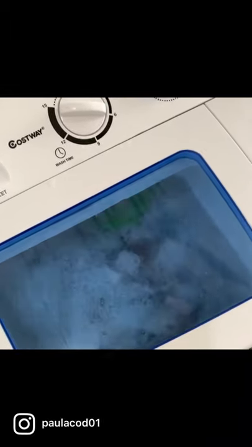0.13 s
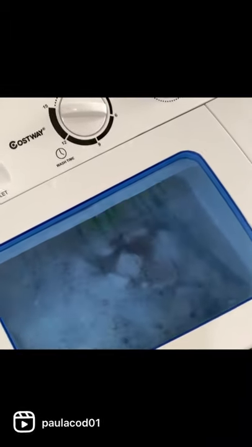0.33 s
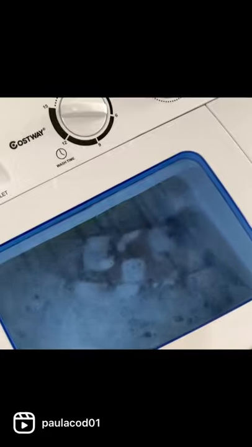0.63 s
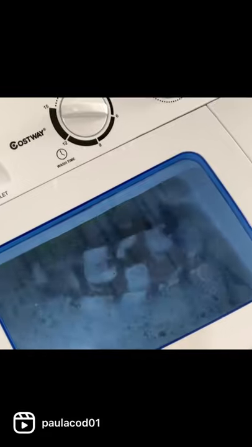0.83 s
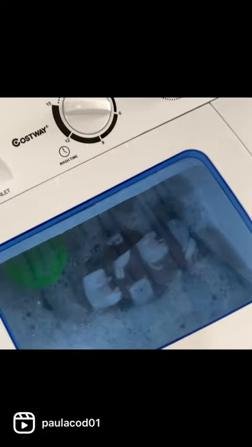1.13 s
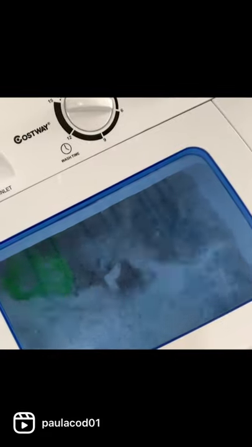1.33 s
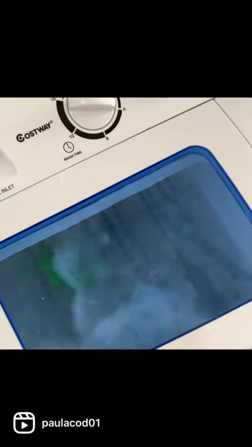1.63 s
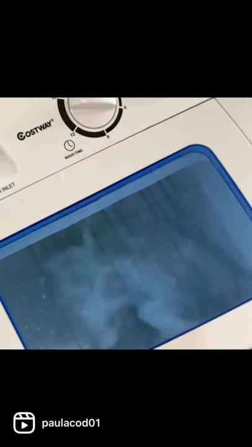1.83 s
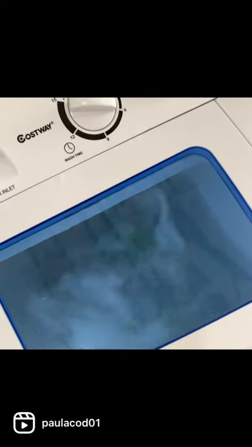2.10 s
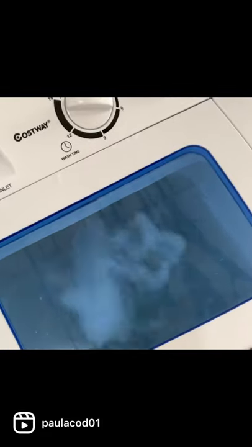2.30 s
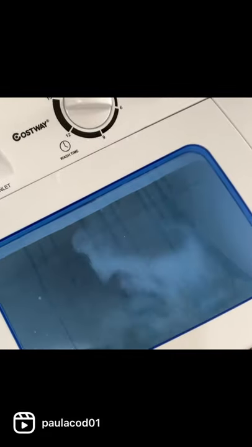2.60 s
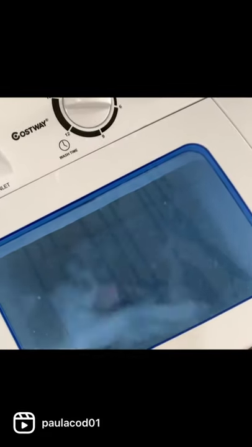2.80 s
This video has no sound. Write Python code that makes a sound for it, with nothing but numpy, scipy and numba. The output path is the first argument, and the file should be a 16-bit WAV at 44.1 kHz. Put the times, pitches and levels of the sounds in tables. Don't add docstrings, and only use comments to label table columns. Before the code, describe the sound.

A small washing machine motor, heard close above the tub in a hard room. Until 0.65 s only rapid faint timer ticks, a soft whirr and small water gulps. A switch snaps at about 0.68 s; the motor swells into a low mains hum with tub rumble by 0.95 s. Water sloshes, with a clear gulp near 2.3 s; hissing spray rises around a hard snap at 2.66 s, motor still running.

```python
import sys
import numpy as np
from scipy import signal
from scipy.fft import rfft, irfft
from scipy.io import wavfile
from scipy.ndimage import uniform_filter1d
from numba import njit

SR = 44100
rng = np.random.default_rng(int(sys.argv[2]) if len(sys.argv) > 2 else 0)


def put_to_file(sound):
    columns = np.atleast_2d(sound).T
    safe = np.clip(columns, -1, 1)
    whole_steps = np.round(safe * 32767)
    wavfile.write(sys.argv[1], SR, whole_steps.astype(np.int16))


def invert_db(level):
    return 10 ** (np.asarray(level, dtype=float) / 20)


N = 130095
TIME = np.arange(N) / SR
START_S = 0.68


def level(x, db):
    return x * invert_db(db) / np.sqrt(np.mean(x ** 2))


@njit
def resonator(x, hz, width):
    y, band, low = np.empty(len(x)), 0., 0.
    g, k = np.tan(np.pi * hz / SR), width / hz
    for i in range(len(x)):
        v = (band + g * (x[i] - low)) / (1 + g * (g + k))
        band, low = 2 * v - band, low + 2 * g * v
        y[i] = k * v
    return y


def walk(rate):
    k = int(SR / rate)
    steps = np.repeat(rng.standard_normal(N // k + 1), k)
    return 1.336 * uniform_filter1d(uniform_filter1d(steps, k), k)[:N]


def column(table, axis):
    points = np.array(table)
    return np.interp(TIME, points[:, 0], points[:, axis])


def switch_on(rise_s):
    return np.clip((TIME - START_S) / rise_s, 0, 1)


def coloured(shape, flicker_db, rate, shared_db=0.):
    hz = np.maximum(np.arange(N // 2 + 1) * SR / N, 1)
    points = np.array(shape)
    colour_db = np.interp(np.log(hz), np.log(points[:, 0]), points[:, 1], left=-90, right=-90)
    spectrum = rfft(rng.standard_normal(N)) * invert_db(colour_db)
    place = 2 * np.log2(hz)
    out = np.zeros(N)
    for centre in range(9, 29):
        weight = np.clip(1 - abs(place - centre), 0, 1)
        out += irfft(spectrum * weight, N) * invert_db(flicker_db * walk(rate))
    return level(out * invert_db(shared_db * walk(rate)), 0)


def strikes(times, dbs, body, rise_s, bright_db=0.):
    out = np.zeros(N)
    at = np.clip((np.array(times) * SR).astype(int), 0, N - 1)
    rise = 1 / (rise_s * SR + 1)
    for hz, width, db, t60 in body:
        hits = np.zeros(N)
        hits[at] = invert_db(np.array(dbs) + db + (hz > 8000) * np.array(bright_db))
        env = signal.lfilter([1], [1, -invert_db(-60 / (t60 * SR))], hits)
        env = signal.lfilter([rise], [1, -1 + rise], env)
        out += env * level(resonator(rng.standard_normal(N), min(1. * hz, 16000.), 1. * width), 0)
    return out


def bubbles(rows, cycles_1k, glide, size=0):
    out = np.zeros(N + SR)
    for t, db, hz in rows:
        cycles = cycles_1k * (hz / 1000) ** size
        u = np.arange(int(3 * cycles / hz * SR) + 2) / SR * hz / cycles
        env = np.exp(-2.3 * u) * (1 - np.exp(-14 * u))
        tone = np.sin(2 * np.pi * cycles * (u + glide * u * u / 2))
        out[int(t * SR):][:len(u)] += invert_db(db) * env * tone
    return out[:N]


# (time [s], power [dB], shaft lines [dB], tub rumble [dB])
MOTOR_LOAD = [(.69, -46, -3, 5), (.75, -35, -4, -1), (.83, -29.5, 0, 0), (.94, -25.5, 1, -1.5),
              (1.1, -27, -1, -0.5), (1.22, -25, 1, -1), (1.45, -27, -1.5, -1.5), (1.62, -24, 0, -1.5),
              (2.05, -27, -1, -2), (2.25, -25, -2, -1.5), (2.48, -29, -3.5, -4), (2.55, -24.5, -2, -1),
              (2.75, -27, -3.5, -2), (2.86, -23.5, -3.5, -0.5), (2.95, -26, -4, -0.5)]
# (multiple of 120.56 Hz, level [dB])
HUM_HARMONICS = [(1, -4), (2, -15.5), (3, -22.5)]
# (multiple of shaft rate, level [dB])
SHAFT_ORDERS = [(1, -29.5), (3, -12), (4, -7.5), (5, -17), (6, -18.5), (9, -25)]
# (frequency [Hz], level per Hz [dB])
TUB_COLOUR = [(60, -25), (100, -6), (140, -3.5), (210, 0), (300, -7), (420, -16), (700, -34), (1500, -51)]


def motor():
    mains_hz, shaft_hz = 120.56, 55.3
    hum = []
    for k, db in HUM_HARMONICS:
        waver_db = (.8 if k == 1 else 3.) * walk(8.92)
        hum.append(invert_db(db + waver_db) * np.sqrt(2) * np.sin(2 * np.pi * k * mains_hz * TIME + k))

    start_hz, sag_s = 2.2, .5
    speed_hz = shaft_hz + start_hz * np.exp(-np.maximum(TIME - 1, -.2) / sag_s)
    turn = 2 * np.pi * np.cumsum(speed_hz * (1 + 0.003003 * walk(5.93))) / SR
    shaft = np.zeros(N)
    for k, db in SHAFT_ORDERS:
        shaft += invert_db(db + 2.72 * walk(11)) * np.sqrt(2) * np.sin(k * turn + k * k)

    power = invert_db(column(MOTOR_LOAD, axis=1)) * switch_on(.03)
    tub = invert_db(-2.5 + column(MOTOR_LOAD, axis=3)) * coloured(TUB_COLOUR, 1.3, 14, 1.18)
    body = sum(hum[1:]) + shaft * invert_db(column(MOTOR_LOAD, axis=2)) + tub
    spread = invert_db(-18.5) * coloured(TUB_COLOUR, 1.5, 12)
    return power * hum[0], power * body, power * spread


# (time [s], level [dB], frequency [Hz])
GULP_EVENTS = [(.01, -43, 760), (.2, -40, 785), (.275, -38.5, 720), (.342, -42, 560), (.5, -50, 560),
               (.75, -36, 520), (.99, -27, 560), (1.6, -36.5, 1200), (2.322, -24, 603), (2.45, -34, 1310),
               (2.497, -30, 890), (2.765, -40, 1900), (2.862, -38.5, 4700), (2.915, -45, 4600)]


def gulps():
    return bubbles(GULP_EVENTS, cycles_1k=12., glide=.04, size=1)


# (time [s], slosh [dB], spray [dB])
WATER_MOTION = [
    (0.72, -55.5, -82),
    (0.9, -46, -72),
    (1.64, -49, -77),
    (2.04, -54.5, -71),
    (2.08, -47, -69.5),
    (2.52, -47, -63.5),
    (2.63, -48.5, -66),
    (2.67, -43, -60),
    (2.7, -48.5, -57.5),
    (2.95, -46.5, -61),
]
# (frequency [Hz], level per Hz [dB])
WATER_COLOUR = [(240, -26.5), (400, -6), (511, -1), (670, -13.5), (748, -8.5), (3380, -26), (4480, -29.5),
                (7500, -43.5), (9750, -70), (16500, -120)]


def water():
    fizz_per_s = 900
    r = rng.random((int(fizz_per_s * 3), 3))
    hz = 500 * 9.4 ** r[:, 1]
    db = -2.8 * np.log(r[:, 2] + 1e-9) - 4.5 * np.log2(hz)
    fizz = bubbles(np.c_[r[:, 0] * N / SR, db, hz], 5.9, 0.18)
    wash = coloured(WATER_COLOUR, 1.77, 11.97, 1.6) + level(fizz, -7.5)
    return switch_on(0.031) * invert_db(column(WATER_MOTION, axis=1) + 4.5) * wash


# (frequency [Hz], level per Hz [dB])
SPRAY_COLOUR = [(5000, -9.5), (7000, 0.5), (9000, 1.5), (11000, -5), (13000, -1.5), (14500, -9),
                (15800, -16)]


def spray():
    return invert_db(column(WATER_MOTION, axis=2) + 3.5) * coloured(SPRAY_COLOUR, 1.5, 14, 1.5) * switch_on(0.034)


# (time [s], level [dB], brightness above 8 kHz [dB])
CAM_SNAPS = [(.654, -57, -6), (.673, -49, -6), (.678, -33.5, -6), (1.71, -52, 2.5), (2.04, -56.5, 6),
             (2.18, -49.5, 7.5), (2.45, -54, 2.5), (2.605, -46, -7), (2.628, -43, -2.5), (2.643, -52, 4),
             (2.664, -30.5, -3), (2.714, -44.5, -0.5), (2.822, -52, 5)]
# (frequency [Hz], width [Hz], level [dB], decay t60 [s])
SWITCH_HOUSING = [(2430, 640, -4, 0.08), (3757, 130, -3, 0.051), (4083, 450, -10, 0.032),
                  (4500, 200, -9, .04), (4820, 900, -25.5, 0.014), (5800, 250, -27, 0.038),
                  (7370, 1100, -8.5, 0.027), (8500, 900, -7.5, .03), (9760, 540, -4.5, .04),
                  (10640, 540, -7.5, 0.036), (12060, 600, -7, 0.039), (13600, 900, -10, .03),
                  (15000, 900, -9, 0.027)]


def cam_switch():
    t, db, bright = np.array(CAM_SNAPS).T
    tail_db, tail_t60_s = -21, 0.32
    tail = [(hz, 1.1 * width, d + tail_db, tail_t60_s) for hz, width, d, _ in SWITCH_HOUSING]
    return strikes(t, db, SWITCH_HOUSING, 0.002, bright) + strikes(t, db, tail, 0.0041, bright)


# (time [s], swing number [count])
ESCAPEMENT_SWINGS = [(.0503, 1), (.6265, 11), (.6815, 12), (1.1283, 20), (1.5723, 28), (1.8507, 33),
                     (2.0118, 36), (2.1814, 39), (2.4034, 43), (2.8509, 51)]
# (frequency [Hz], width [Hz], level [dB], decay t60 [s])
TICK_BODY = [(6040, 700, -13.5, 0.022), (6800, 500, -9, 0.019), (10000, 900, -5, 0.022),
             (13360, 600, 3, 0.033)]
# (frequency [Hz], width [Hz], level [dB], decay t60 [s])
TOCK_BODY = [(3853, 110, -2, 0.18), (2800, 400, 0, .06), (11230, 200, -11, 0.2), (13200, 900, 3, .03),
             (15000, 1200, -6, .03)]


def escapement():
    swings = np.array(ESCAPEMENT_SWINGS)
    earlier = 2 * swings[0, 0] - .1079
    at = np.append(earlier, np.interp(np.arange(1, 52), swings[:, 1], swings[:, 0]))
    tick_db, tock_db, tock_late_s, scatter_db = -60, -66.5, .0305, 1.5
    scatter = scatter_db * rng.standard_normal((2, len(at)))
    ticks = strikes(at[1:], tick_db + scatter[0, 1:], TICK_BODY, 0.00046)
    tocks = strikes(at + tock_late_s, tock_db + scatter[1], TOCK_BODY, 0.0013)
    return ticks + tocks


# (frequency [Hz], level per Hz [dB])
WHIRR_COLOUR = [(3000, -5), (3850, 4), (5000, -10), (8000, -17), (10600, -12), (11200, -7), (11900, 0.5),
                (15500, -15)]


def whirr():
    return invert_db(-76.5) * coloured(WHIRR_COLOUR, 1.7, 20)


# (frequency [Hz], level per Hz [dB])
ROOM_COLOUR = [(15, -39), (25, -17.5), (54, -6.5), (115, -11), (199, -2), (530, -15), (598, -11),
               (706, -15.5), (7500, -56), (9750, -89), (16500, -120)]
# (frequency [Hz], level per Hz [dB])
ROOM_SIDE_COLOUR = [(15, -44.5), (25, -17.5), (247, -10.5), (371, -6), (741, -8), (963, -14), (7500, -42.5),
                    (9750, -73), (16500, -120)]


def room():
    centre = invert_db(-45) * coloured(ROOM_COLOUR, 2.5, 7.93)
    side = invert_db(-52.5) * coloured(ROOM_SIDE_COLOUR, 1.5, 6.5)
    return centre * pan(-0.54) + side * OPPOSED


# (frequency [Hz], phase [half turns])
RIGHT_LAG = [(0, 0), (2200, 0.79), (3850, 1.61), (5500, 2.5), (8500, 3), (11050, 4), (13700, 5), (16400, 6)]


def from_one_side(x):
    half_turns = np.interp(np.arange(N // 2 + 1) * SR / N, *np.array(RIGHT_LAG).T)
    return np.array([x, irfft(rfft(x) * np.exp(-1j * np.pi * half_turns), N)])


OPPOSED = np.array([[1], [-1]])


def pan(left_db):
    return invert_db(np.array([[left_db], [-left_db]]) / 2)


def scene():
    hum, tub, spread = motor()
    machine = hum * pan(-4) + tub * pan(-.3) + spread * OPPOSED
    wash = (water() + invert_db(-1.0) * water() * OPPOSED + gulps()) * pan(1.5)
    aside = invert_db(1.5) * (escapement() + cam_switch()) + spray() + whirr()
    return machine + wash + from_one_side(aside) + room()


def top_cut(x):
    return signal.sosfilt(signal.butter(12, 15830, fs=SR, output="sos"), x)


def record(dry):
    return top_cut(dry)


dry = scene()
out = record(dry)
put_to_file(out)
```